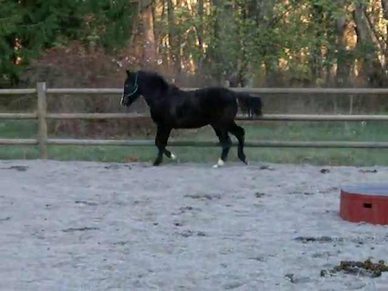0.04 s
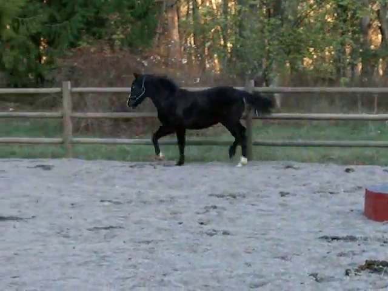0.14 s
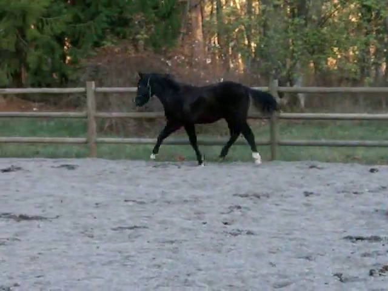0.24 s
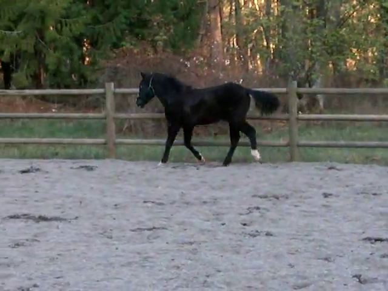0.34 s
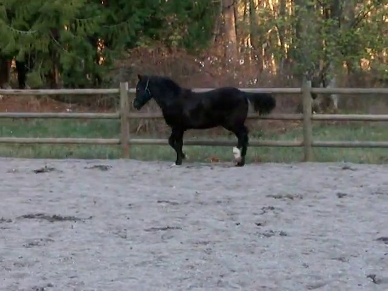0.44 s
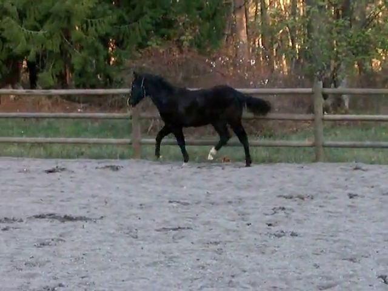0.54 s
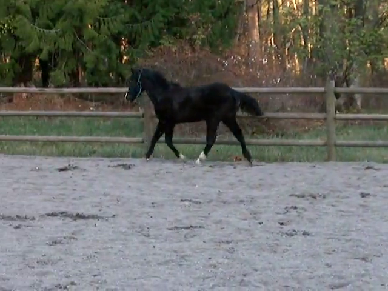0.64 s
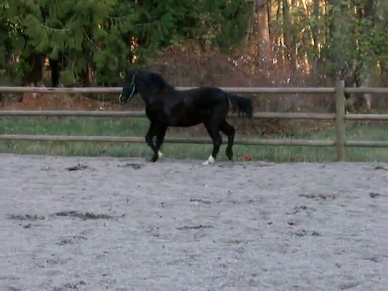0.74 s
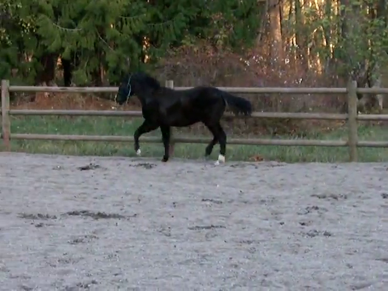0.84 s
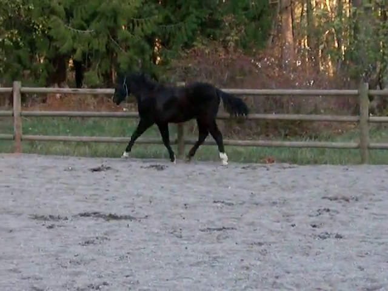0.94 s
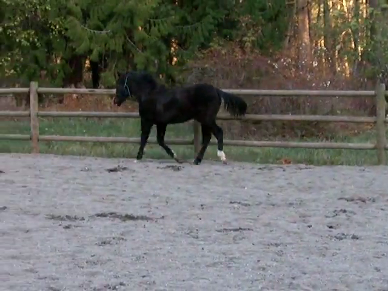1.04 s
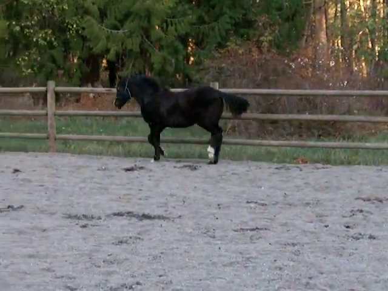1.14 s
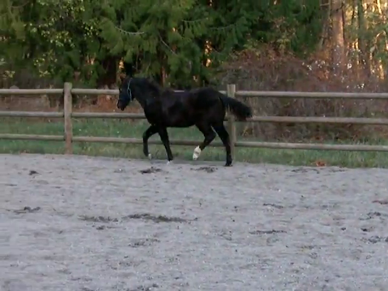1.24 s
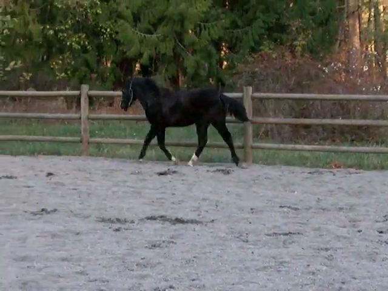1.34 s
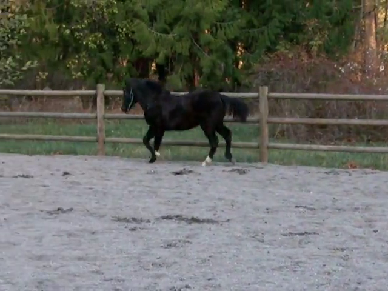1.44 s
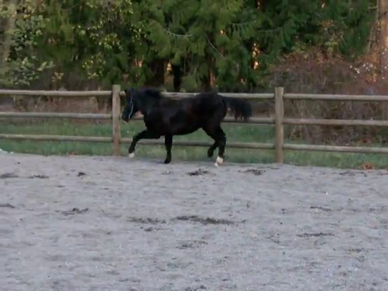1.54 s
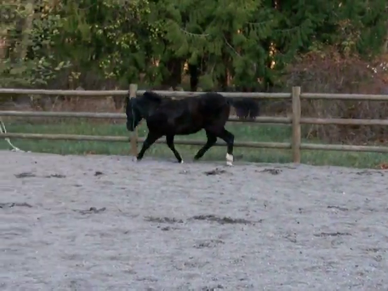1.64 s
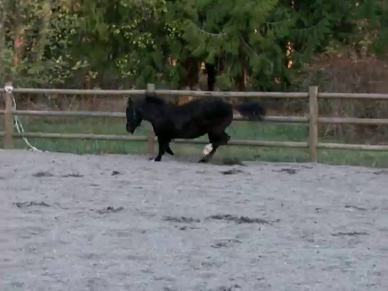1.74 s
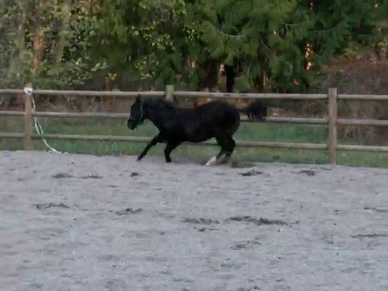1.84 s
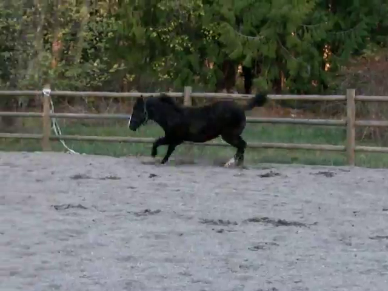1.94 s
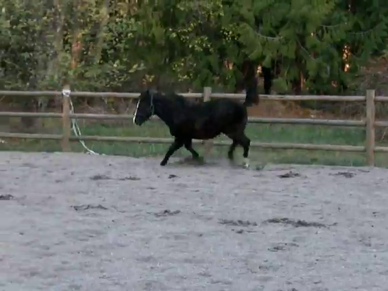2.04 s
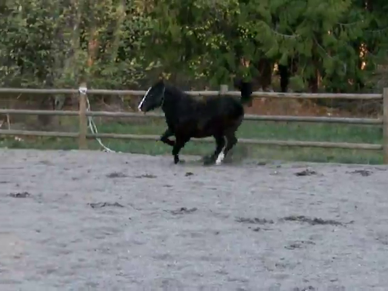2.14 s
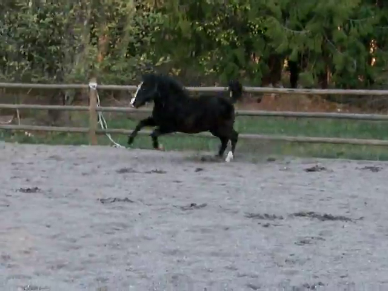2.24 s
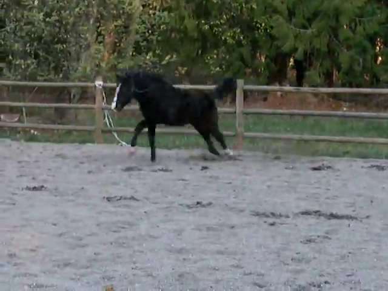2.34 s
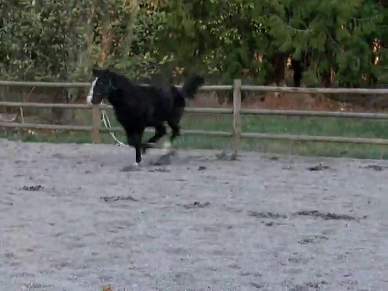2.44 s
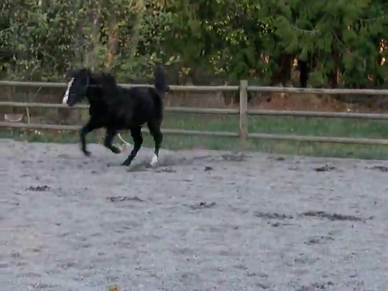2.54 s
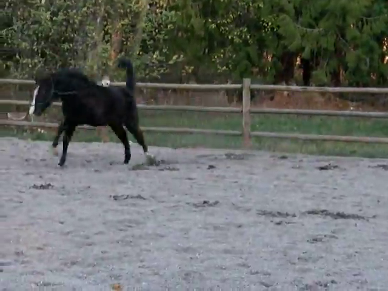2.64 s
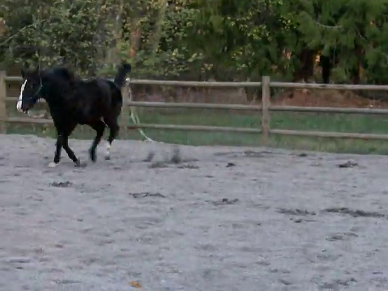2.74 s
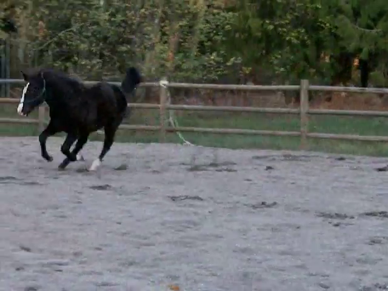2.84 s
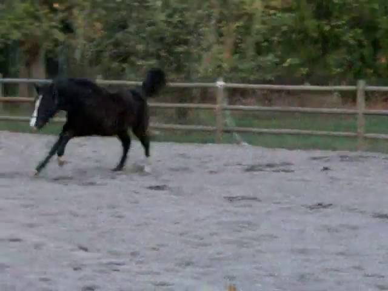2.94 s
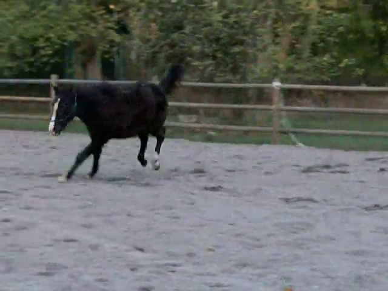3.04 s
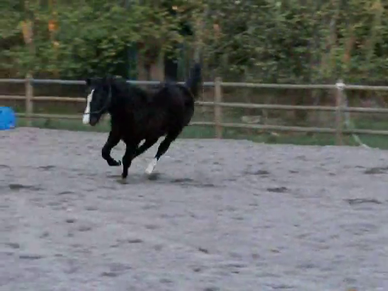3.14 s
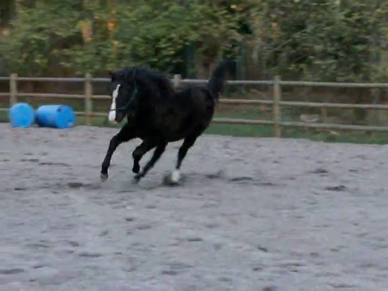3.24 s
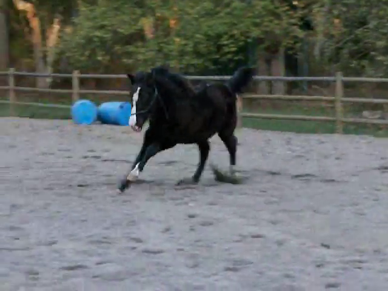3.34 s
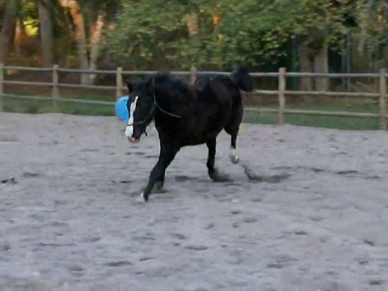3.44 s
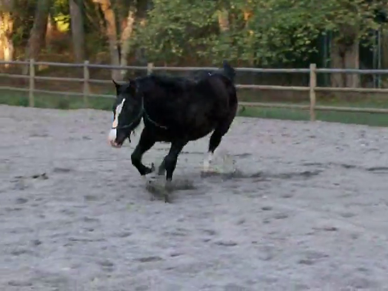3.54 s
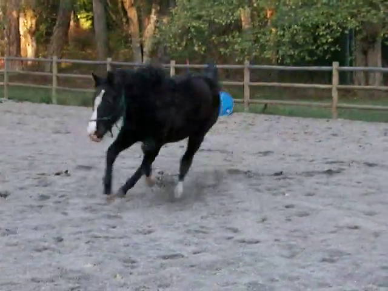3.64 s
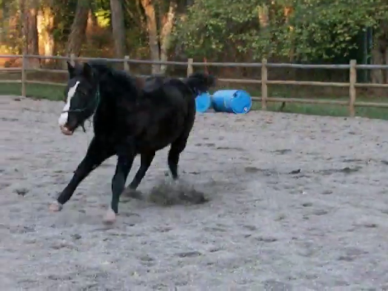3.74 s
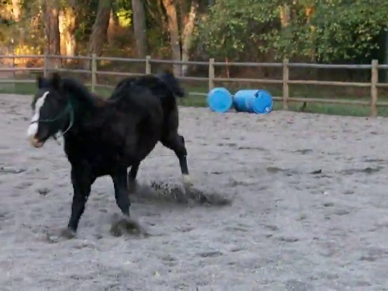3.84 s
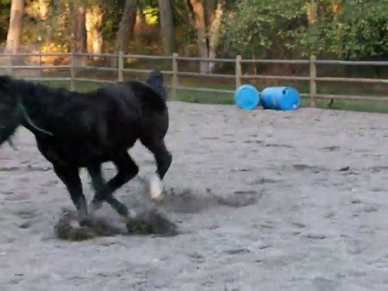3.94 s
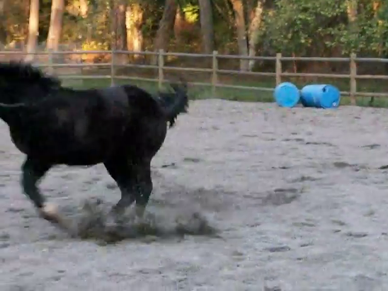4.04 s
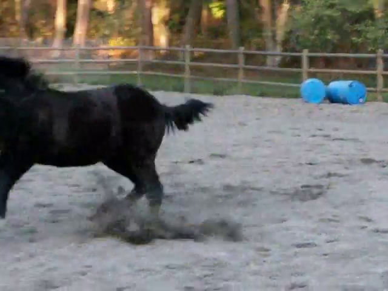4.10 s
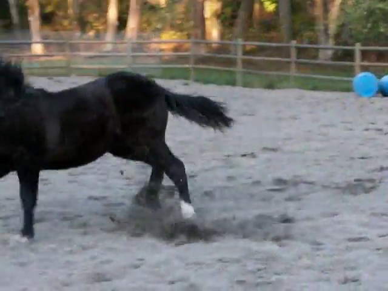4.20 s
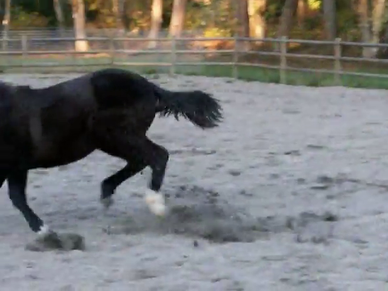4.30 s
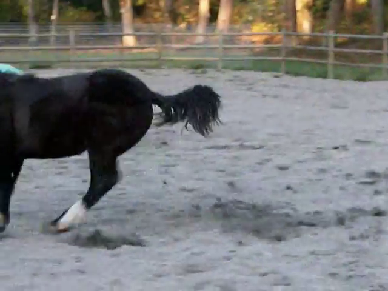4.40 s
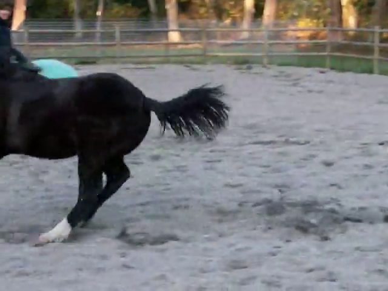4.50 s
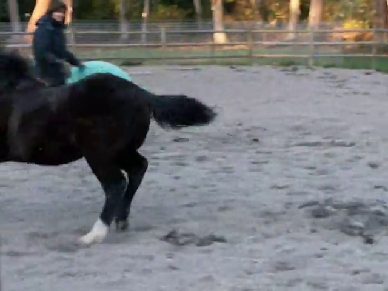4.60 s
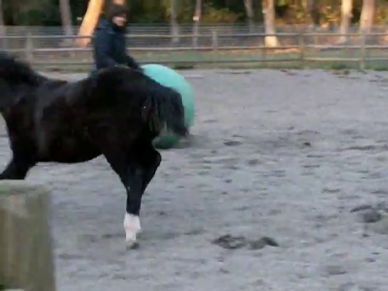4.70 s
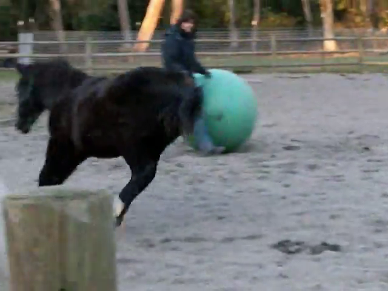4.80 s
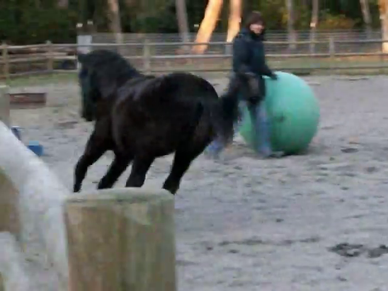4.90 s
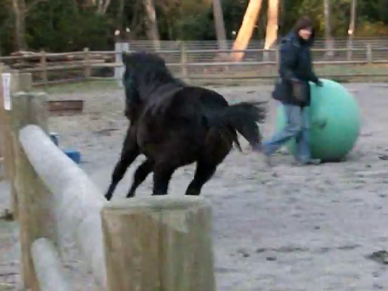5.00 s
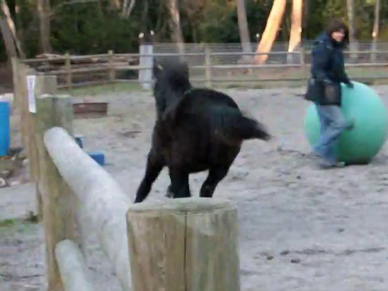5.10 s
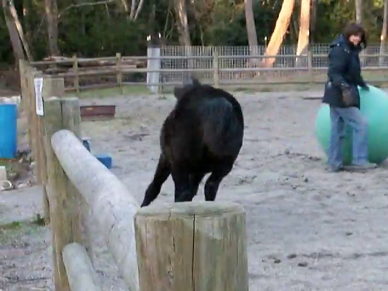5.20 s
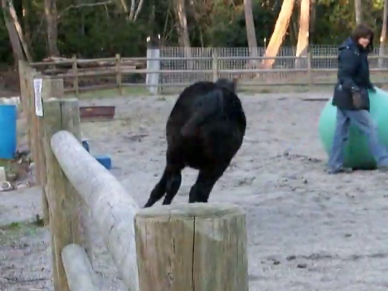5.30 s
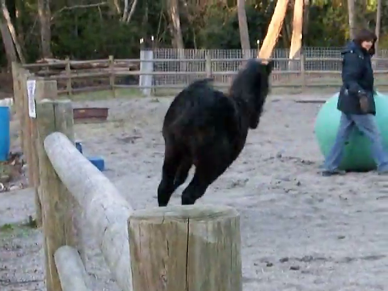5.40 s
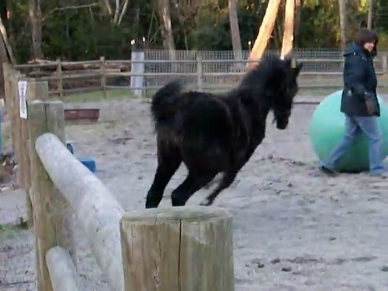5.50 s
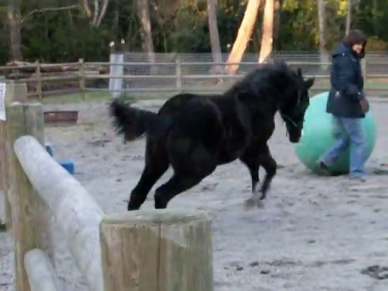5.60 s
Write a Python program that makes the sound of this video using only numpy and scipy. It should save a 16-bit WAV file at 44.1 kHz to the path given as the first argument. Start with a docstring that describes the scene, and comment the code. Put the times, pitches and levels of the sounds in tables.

```python
"""Hoofs crunch into sand as a young horse trots, then canters round an arena, passing close to a hand-held camera.
Sand is made of tiny random clicks: each hoof shapes a crunch and a spray, and the nearest ones add a low thud.
Pebbles click, damp clods patter, and a small chain jingles at first: its links slide and ring at fixed pitches.
Wind, made of low noise and short thumps, buffets mostly the left microphone port.
The lens motor ticks and knocks in short runs, over a far rumble with airy hiss and a thin whine."""
import sys
import numpy as np
from scipy import signal
from scipy.fft import rfft, irfft, next_fast_len
from scipy.io import wavfile
from scipy.ndimage import uniform_filter1d

SR = 44100
rng = np.random.default_rng(int(sys.argv[2]) if len(sys.argv) > 2 else 0)


def master_out(mix):
    """Clip the mix to full scale and print it as 16-bit PCM to the path in sys.argv[1]."""
    frames = np.transpose(np.atleast_2d(mix))
    ceiling = np.clip(frames, -1, 1)
    pcm = np.round(ceiling * 32767).astype(np.int16)
    wavfile.write(sys.argv[1], SR, pcm)


N = 249606
T = np.arange(N) / SR

# hoof strikes and scuffs: (time [s], crunch level [dB], spray level [dB], spray length [s])
HOOF_STRIKES = [(1.729, -35, -29.5, .018), (1.798, -22.5, -33, 0.056), (1.855, -19.5, -34, 0.038),
                (2.01, -26.5, -39, 0.086), (2.092, -16.5, -35, .015), (2.136, -21, -23.5, 0.055),
                (2.328, -34, -31.5, .1), (2.404, -23.5, -26, 0.051), (2.481, -38, -29, 0.084),
                (2.639, -24.5, -31, 0.075), (2.733, -17.5, -31, .06), (2.818, -22, -28, 0.087),
                (2.955, -22.5, -27, 0.069), (3.035, -20, -31, 0.057), (3.176, -20, -26, 0.044),
                (3.232, -19, -31, 0.073), (3.283, -34, -23.5, .022), (3.333, -33, -24, 0.055),
                (3.414, -25, -21, 0.058), (3.543, -17.5, -29, 0.021), (3.601, -18, -20, 0.091),
                (3.744, -16.5, -16.5, 0.18), (3.958, -15.5, -15, 0.12), (4.132, -13.5, -17.5, 0.15),
                (4.37, -7.5, -18.5, 0.14), (4.54, -33, -18.5, 0.029), (4.561, -10.5, -17, .014),
                (4.601, -19.5, -19.5, 0.022), (4.674, -18, -29, 0.075), (4.761, -36, -24.5, .015),
                (4.842, -17, -15.5, .018), (4.938, -20, -20.5, 0.04), (5.056, -15, -40.5, 0.051),
                (5.166, -26, -32.5, 0.072), (5.3, -13, -19.5, 0.019), (5.335, -37, -32, 0.046),
                (5.394, -17, -31.5, .09), (5.525, -27, -35.5, 0.058), (5.631, -24, -19.5, 0.025)]
# tone of crunching sand at the two ports: (frequency [Hz], left level [dB], right level [dB])
SAND_TONE = [(100, -11.5, -30.5), (300, -14, -11.5), (500, -18.5, -21.5), (990, -14, -17),
             (1504, -20, -22.5), (2610, -13, -9.5), (3570, -8.5, -7), (4630, -6.5, -7), (4730, -10.5, -4.5),
             (5364, 0.5, -10.5), (6000, 1, -14), (6890, -11, -15), (7570, -19, -21), (9060, -48, -47)]


def undb(db):
    """Turn decibels into a plain gain."""
    return 10 ** (np.asarray(db) / 20)


def unit(x):
    """Scale to an average strength (rms) of 1."""
    return x / np.sqrt(np.mean(x ** 2))


def curves(table):
    """Join each column of a table of timed rows with straight lines."""
    s, *columns = np.transpose(table)
    return [np.interp(T, s, c) for c in columns]


def since(s):
    """Seconds since a moment, zero before it."""
    return np.maximum(T - s, 0)


def add(out, s, sound):
    """Mix a short sound in at a moment; one that would begin before the start is left out."""
    i = int(s * SR)
    if 0 <= i < N:
        out[..., i:i + sound.shape[-1]] += sound[..., :N - i]


def colour(x, table):
    """Give a sound the tone in (frequency, level) or (frequency, left, right) rows, with no echo ahead of it."""
    size = next_fast_len(N // 2 + 4096) * 2
    hz, *columns = np.transpose(table)
    log_f = np.log(np.maximum(np.fft.rfftfreq(size, 1 / SR), 1))
    gain = unit(undb([np.interp(log_f, np.log(hz), c) for c in columns]))
    # folding the cepstrum (spectrum of the log gain) forward makes the filter answer only after its input
    cepstrum = irfft(np.log(gain))
    cepstrum[:, 1:size // 2] *= 2
    cepstrum[:, size // 2 + 1:] = 0
    return irfft(rfft(x, size) * np.exp(rfft(cepstrum)))[:, :N]


def band(x, lo_hz, hi_hz):
    """Gently keep the pitches between two limits."""
    return signal.sosfilt(signal.butter(2, [lo_hz, hi_hz], "band", fs=SR, output="sos"), x)


def walk(rate):
    """A smoothed random wander with a spread near 1, drawing `rate` new values per second."""
    k = int(SR / rate)
    steps = np.repeat(rng.standard_normal(N // k + 1), k)
    return unit(uniform_filter1d(steps, k)[:N])


def grains(rate, spread_db):
    """Tiny collisions, about `rate` per second, many faint and a few strong; rms 1."""
    size = undb(spread_db * np.minimum(rng.exponential(size=N), 5))
    hits = rng.random(N) < rate / SR
    return unit(hits * rng.choice([-1, 1], N) * size)


def ports(shared, own, apart):
    """A sound at both ports: it reaches the left one first, and a share of its power is scattered."""
    apart = np.clip(apart, 0, 1)
    direct = np.array([shared, np.roll(shared, 1)])
    return np.sqrt(1 - apart) * direct + np.sqrt(apart) * np.array(own)


def thump(hz, cycles, sag):
    """A heavily damped swing whose pitch sags as it dies; peak near 1."""
    turns = hz * T[:SR // 8]
    age = turns / cycles
    return np.sin(2 * np.pi * np.log1p(sag * turns) / sag) * age * np.exp(1 - age)


def swells(table):
    """Level of soft-edged bursts; each row's length is the time from its start to its peak."""
    level = 0
    for s, db, length in table:
        age = since(s) / length
        level = level + undb(db) * age ** 2 * np.exp(2 - 2 * age)
    return level


def outdoors():
    """Far rumble, alike at both ports, with airy hiss and a thin whine that barely wavers."""
    # overall background: (time [s], level [dB])
    background_level = [(0, -43.5), (0.3, -46), (1, -47.5), (1.2, -42.5), (1.5, -40), (3, -40.5),
                        (4, -39.5), (5.2, -38.5), (5.66, -41.5)]
    # tone of the rumble and hiss: (frequency [Hz], level [dB])
    air_tone = [(12, 11), (30, 13.5), (80, 4.5), (150, -0.5), (300, 0), (480, -1), (720, 0.5), (1000, -4),
                (1400, -7.5), (1900, -8), (2400, -11.5), (4000, -14.5), (5700, -7), (7000, -19),
                (8600, -46.5)]
    air_db, whine_db, octave_db = 5, -8.5, -13
    whine_hz = 718
    shared, *own = rng.standard_normal((3, N))
    low = signal.sosfilt(signal.butter(1, 1300, fs=SR, output="sos"), [shared, *own])
    # the lows are mostly shared, the highs belong to each port alone
    noise = low[0] + np.array(own) - 0.78 * low[1:]
    air = unit(colour(noise, air_tone))
    phase = 2 * np.pi * np.cumsum(whine_hz + 0.65 * walk(13)) / SR
    whine = unit(np.sin(phase) + undb(octave_db) * np.sin(2 * phase))
    whine = whine * undb(0.83 * walk(7))
    mix = undb(air_db + 0.74 * walk(6)) * air + undb(whine_db) * whine
    return undb(curves(background_level)[0]) * mix


def wind():
    """Each port has its own gusty turbulence; swirls of air (eddies) thump the left one and leak to the right."""
    # breeze on the ports: (time [s], level [dB], left minus right [dB])
    breeze = [(0, -37.5, 1), (0.48, -35.5, 7), (0.62, -41.5, 3), (1.4, -31.5, 5.5), (1.63, -21.5, 17),
              (1.8, -25.5, 8.5), (2.2, -21.5, 6), (2.47, -24.5, 10.5), (2.88, -30, 0.5), (3.42, -20, 17.5),
              (3.68, -25.5, 16), (3.9, -23.5, 14), (4.48, -26, 11), (4.92, -31.5, -6.5), (5.3, -32.5, -5),
              (5.66, -43.5, -8)]
    # tone of the wind rumble: (frequency [Hz], level [dB])
    rumble_tone = [(10, -9.5), (28, -1.5), (55, -1.5), (100, -5.5), (160, -12), (250, -26), (400, -39),
                   (900, -75.5)]
    # strongest eddies at the left port: (time [s], strength [dB], starting pitch [Hz])
    strong_eddies = [(1.601, -6, 147), (1.699, -8, 153), (1.859, -11.5, 105), (2.008, -3, 165),
                     (2.089, -8.5, 78), (2.136, -9.5, 160), (2.223, -6.5, 154), (2.294, -9, 131),
                     (3.299, -8.5, 140), (3.35, -10, 92), (3.438, -3.5, 134), (3.845, -9, 137),
                     (3.949, -8, 136), (4.331, -14, 124)]
    gust_db, gusts_per_s = 1.0, 9
    count, eddy_db, eddy_scatter_db, onset_db = 90, 3, 2.5, -25
    eddy_hz, eddy_octaves = 145, 0.36  # middle pitch and random spread
    leak = 0.052  # share of an eddy in the right port, as a gain

    db, pan_db = curves(breeze)
    sides = undb([pan_db / 2, -pan_db / 2])
    strength = undb(db) * sides / np.sqrt(np.mean(sides ** 2, axis=0))
    turbulence = colour(rng.standard_normal((2, N)), rumble_tone)
    out = strength * undb(gust_db * walk(gusts_per_s)) * turbulence

    # small eddies come at random; their strength follows the breeze and drops faster in light air
    moments = (np.arange(count) + rng.random(count)) / count * T[-1]
    breeze_db = np.interp(moments, T, 20 * np.log10(strength[0]))
    small_eddies = []
    for s, b, (size, pitch) in zip(moments, breeze_db, rng.standard_normal((count, 2))):
        db = b + eddy_db + min(b - onset_db, 0) + eddy_scatter_db * size
        small_eddies.append((s, db, eddy_hz * 2 ** (eddy_octaves * pitch)))
    for s, db, hz in [*strong_eddies, *small_eddies]:
        eddy = thump(hz, cycles=0.56, sag=0.12)
        # noise that follows the outline of the thump
        flutter = unit(band(rng.standard_normal(len(eddy)), 110, 266)) * np.abs(signal.hilbert(eddy))
        add(out, s, undb(db) * np.outer([1, leak], band(eddy + 0.47 * flutter, 25, 340)))
    return out


def lens():
    """The motor wakes, takes five steps and parks; its knocks make the camera body ring, most after a tick."""
    # motor runs: (time of first step [s], knock level [dB], tick level [dB])
    motor_runs = [(0.0115, -5.5, -7), (1.2101, -1.5, -2.5), (2.7438, 2, 1), (3.9454, 1, -4),
                  (4.9122, 2.5, -1)]
    # ringing of the camera body: (frequency [Hz], level [dB], time to fade by 60 dB [s])
    body_ring = [(221, 4.5, 0.023), (354.5, 4, 0.025), (655, -4, 0.015), (983, 3, 0.031),
                 (1300, -13.5, 0.025), (1547, -3.5, 0.019), (1850, -6, 0.023), (2400, -9, 0.021)]
    steps_per_s = 29.97
    knock_db, tick_db, rattle_db = -20.0, -23.5, -33
    push_s, rattle_s, tick_s = 0.0033, 0.0028, 0.0012  # how fast each sound builds
    lag_s = 0.00218  # knock after tick
    wake_s, wake_db = 0.075, 0  # before the first step
    park_s, park_db = 0.181, -0.6  # after the first step

    t = T[:SR // 16]
    ring = 0
    for k, (hz, db, t60) in enumerate(body_ring):
        ring = ring + (-1) ** k * undb(db - 60 * t / t60) * np.sin(2 * np.pi * hz * t)
    knock = undb(knock_db) * ring * (1 - np.exp(-t / push_s))
    soft_knock = band(knock, 140, 600)
    out = np.zeros((2, N))
    for s, db, sharp_db in motor_runs:
        add(out, s - wake_s, undb(db + wake_db) * soft_knock)
        for k, step in enumerate(s + np.arange(5) / steps_per_s):
            # play in the gears adds a rattle that differs at every step
            rattle = unit(band(rng.standard_normal(len(t)), 450, 1500))
            rattle = rattle * t / rattle_s * np.exp(1 - t / rattle_s)
            add(out, step + lag_s, undb(db) * (knock + undb(rattle_db) * rattle))
            teeth = unit(band(band(rng.standard_normal(len(t)), 3530, 5140), 1500, 5000))
            tick = undb(tick_db + sharp_db) * teeth * t / tick_s * np.exp(1 - t / tick_s)
            # the first step starts from rest and has no tick; the others tick louder on the right
            if k > 0:
                add(out, step, np.outer([.6, 1], tick))
        add(out, s + park_s, undb(db + park_db) * soft_knock)
    return out


def chain():
    """The links slide with a hiss and strike each other; a few clear pitches and a dense shimmer ring on."""
    # shakes of the small metal chain: (time [s], level [dB], time to peak [s])
    shakes = [(-0.045, -27.5, 0.038), (0.32, -41, 0.024), (0.374, -22.5, 0.027), (0.468, -24.5, 0.013),
              (0.635, -38.5, 0.036), (1.076, -29, 0.02)]
    # pitches the links ring with: (frequency [Hz], level [dB])
    link_pitches = [(1770, -13.5), (1890, -6.5), (2330, -12), (2870, -3), (3020, -21), (3214, -5.5),
                    (3472, -9), (3565, -5), (3956, -4), (4000, -16), (4122, 2), (4430, -7), (4640, 7),
                    (4828, -6), (5177, -4), (5228, -2), (5331, 6.5), (5439, -7), (5668, 6), (5738, -2),
                    (5950, -10)]
    # tone of links sliding on each other: (frequency [Hz], left level [dB], right level [dB])
    slide_tone = [(1000, -33, -35), (2550, -28.5, -15.5), (3080, -9, -8), (3700, -9, -15),
                  (4040, -5.5, -12), (4350, -15.5, -8.5), (5230, 1, -9), (5970, -6, -33),
                  (6930, -19.5, -34), (8640, -47, -51)]
    ring_db, right_db = -4, -5  # right_db is the right port relative to the left
    slide_db, shimmer_db = -2.0, -6
    t60, shimmer_t60 = 0.6, 0.67  # seconds to fade by 60 dB; t60 is for a 4000 Hz pitch

    contacts = swells(shakes) * np.array([grains(rate=5800, spread_db=1.5) for _ in range(2)])
    t = T[:SR]
    ring = 0
    for hz, db in link_pitches:
        # low pitches ring longest
        fade = undb(db - 60 * t / t60 * hz / 4000)
        ring = ring + fade * np.sin(2 * np.pi * (hz * t + rng.random()))
    dense = rng.standard_normal(SR) * undb(-60 * t / shimmer_t60)

    def struck(response):
        """Let every contact set off the same ringing."""
        return signal.fftconvolve(contacts, unit(response)[None] / np.sqrt(SR))[:, :N]

    hiss = undb(slide_db) * ports(contacts[0], contacts, apart=0.93)
    hiss = hiss + undb(shimmer_db) * struck(dense)
    return colour(hiss, slide_tone) + undb([[ring_db], [ring_db + right_db]]) * struck(ring)


def clods():
    """Lumps of damp sand patter down as bursts of tiny collisions, duller than the dry grains."""
    # clods landing: (time [s], level [dB], time to peak [s])
    landings = [(1.806, -33, 0.015), (3.288, -33, .006), (3.77, -35, 0.065), (4.19, -30.5, 0.045),
                (4.485, -25.5, 0.014), (5.325, -33, 0.022), (5.385, -37.5, 0.034)]
    shared, *own = (grains(rate=2200, spread_db=4.5) for _ in range(3))
    return swells(landings) * unit(band(ports(shared, own, apart=0.07), 450, 1300))


def pebbles():
    """Small stones click, alone or under a sinking hoof, and the grit under them cracks."""
    # single pebbles: (time [s], click strength [dB])
    lone_stones = [(0.851, -22), (3.615, 3), (4.354, -11), (4.709, -7)]
    stone_db, scatter_db, grit_db = 4, 3.5, -11  # stone relative to crunch, grit relative to stone
    lag_s, grit_s = .003, 0.0023  # click after hoof strike, grit fading time
    t = T[:SR // 40]
    underfoot = []
    for s, crunch_db, *_ in HOOF_STRIKES:
        underfoot.append((s + lag_s, crunch_db + stone_db + scatter_db * rng.standard_normal()))
    clicks = np.zeros(N)
    for s, db in [*lone_stones, *underfoot]:
        add(clicks, s, undb([db]))
        grit = rng.standard_normal(len(t)) * np.exp(-t / grit_s)
        add(clicks, s, undb(db + grit_db) * grit)
    return colour(clicks, SAND_TONE)


def thuds():
    """Packed ground gives under the weight of the nearest hoofs in a short, heavily damped swing."""
    # hoof thuds: (time [s], level [dB], starting pitch [Hz])
    hoof_thuds = [(3.748, -12.5, 285), (3.8, -4, 328), (3.871, -24, 260), (4.373, -24, 200),
                  (4.495, -18.5, 325), (4.563, -26, 700), (5.304, -24, 600), (5.322, -19, 152)]
    out = np.zeros(N)
    for s, db, hz in hoof_thuds:
        add(out, s, undb(db) * thump(hz, cycles=0.41, sag=0.4))
    return out


def sand():
    """Each hoof crushes the sand, then ploughs it and throws it in clumps; the last grains settle slowly."""
    # loose sand that keeps trickling between the steps: (time [s], level [dB])
    trickle = [(0, -50), (1, -54), (1.35, -41.5), (1.7, -35), (2.6, -34), (3.2, -41), (4.45, -26),
               (4.85, -32), (5.27, -45), (5.66, -46)]
    sink_s, rise_s = 0.0037, 0.003  # how fast the crunch and the spray build
    crest, spread = 0.4, 0.69  # middle and width of the throw, as shares of the spray length
    settle_db, settle_s = -19, 0.19
    clump_db, sorting_db = 1.31, 2.0  # random unevenness of the flow and of each pitch range

    power = undb(curves(trickle)[0]) ** 2
    for s, crunch_db, spray_db, length in HOOF_STRIKES:
        t = since(s)
        # the crunch builds while the hoof sinks in
        crunch = np.tanh(t / sink_s) * t / sink_s * np.exp(1 - t / sink_s)
        # the spray is thickest part of the way through the push
        throw = np.exp(-((t / length - crest) / spread) ** 2)
        settling = undb(settle_db) * np.exp(-t / settle_s)
        spray = (1 - np.exp(-t / rise_s)) * np.hypot(throw, settling)
        power += (undb(crunch_db) * crunch) ** 2 + (undb(spray_db) * spray) ** 2
    flow = np.sqrt(power) * undb(clump_db * walk(170))

    shared, *own = (grains(rate=7000, spread_db=3.0) for _ in range(3))
    size = next_fast_len(N)
    spectrum = rfft(ports(shared, own, apart=0.17), size)
    hz = np.fft.rfftfreq(size, 1 / SR)
    # clumps differ in grain size, so coarse and fine pitches come and go on their own
    pitches = np.linspace(1000, 7000, 5)
    mixed = 0
    for share in np.eye(len(pitches)):
        one_size = irfft(spectrum * np.interp(hz, pitches, share), size)[:, :N]
        mixed = mixed + one_size * undb(sorting_db * walk(90))
    return colour(flow * mixed, SAND_TONE)


def scene():
    """Everything that reaches the two ports, from the background to the hoofs."""
    return outdoors() + wind() + lens() + chain() + clods() + pebbles() + thuds() + sand()


def record(dry):
    """The camera clips at full scale, then a steep filter removes the highest pitches."""
    top_hz = 8700
    low_pass = signal.ellip(8, .2, 70, top_hz, fs=SR, output="sos")
    return signal.sosfilt(low_pass, np.clip(dry, -1, 1))


dry = scene()
out = record(dry)
master_out(out)
```